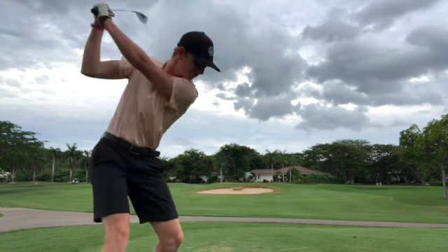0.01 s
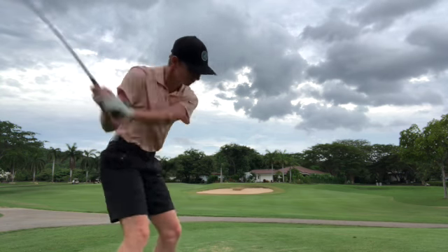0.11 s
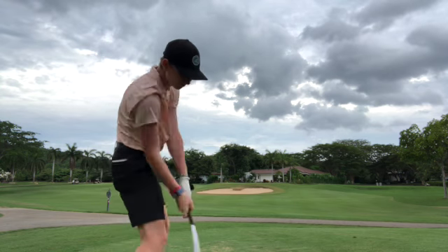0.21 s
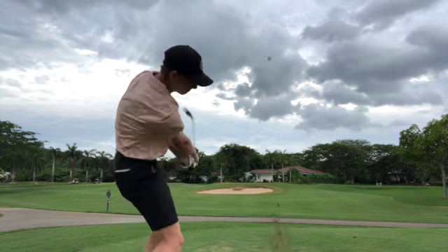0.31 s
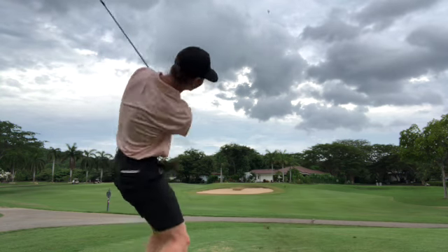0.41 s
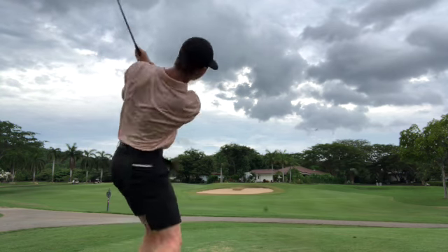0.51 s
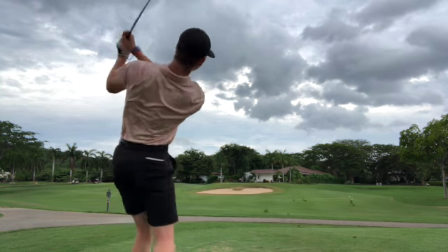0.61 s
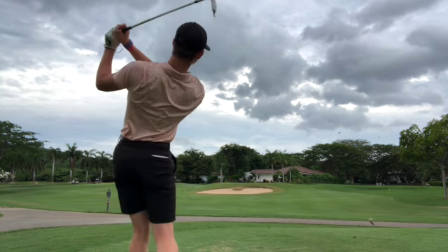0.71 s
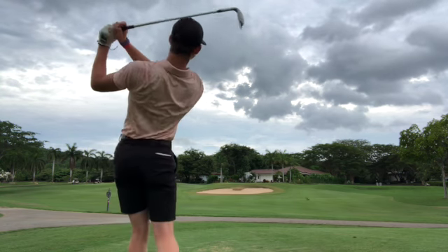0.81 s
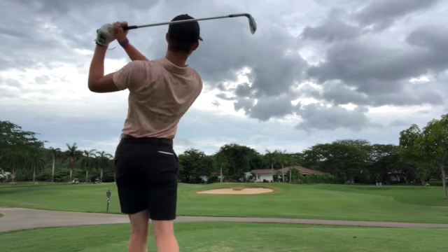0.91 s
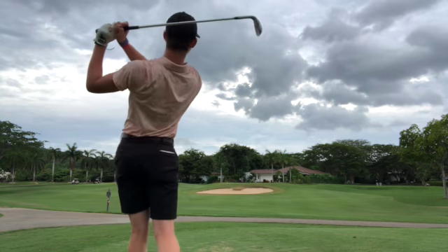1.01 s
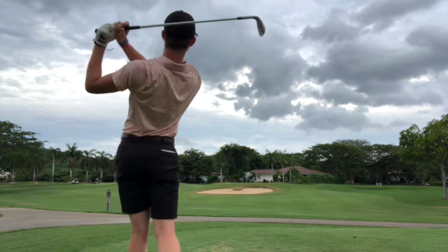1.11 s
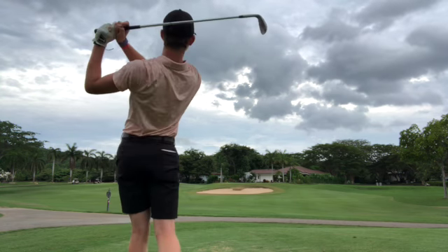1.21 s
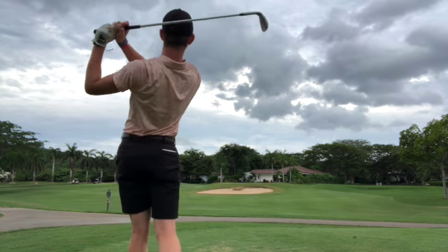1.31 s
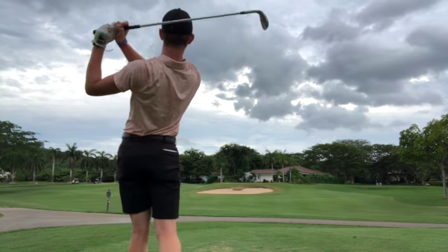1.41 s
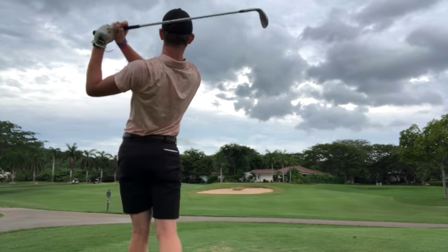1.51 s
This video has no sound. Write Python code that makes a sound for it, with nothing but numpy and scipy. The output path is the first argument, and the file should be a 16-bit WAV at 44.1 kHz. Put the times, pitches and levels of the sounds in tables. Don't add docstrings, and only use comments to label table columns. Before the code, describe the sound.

A golf club swing rushes up in a brief airy whistle, then a hard dry crack on the ball with a small ground thud and grass spray; faint ticks and distant birds follow on an open course.

```python
import sys
import numpy as np
from scipy import signal
from scipy.fft import rfft, irfft
from scipy.io import wavfile
from scipy.ndimage import uniform_filter1d

SR = 44100
rng = np.random.default_rng(int(sys.argv[2]) if len(sys.argv) > 2 else 0)


def unload_wav(signal):
    wavfile.write(
        sys.argv[1],
        SR,
        np.round(np.clip(np.atleast_2d(signal).T, -1, 1) * 32767).astype(np.int16),
    )


def gain_from_db(level_db):
    decades = np.asarray(level_db, float) / 20
    return 10 ** decades


N = 70560
T = np.arange(N) / SR
BALL_S = 0.25753
TURF_END_S = 0.26616


def noise():
    return rng.standard_normal(N)


def coloured(x, points):
    point_hz, point_db = np.array(points).T
    hz = np.maximum(np.arange(N // 2 + 1) * SR / N, 1)
    gain = gain_from_db(np.interp(np.log(hz), np.log(point_hz), point_db))
    low_cut = np.minimum(hz / point_hz[0], 1) ** 4
    y = irfft(rfft(x) * gain * low_cut, N)
    return y / np.std(y)


def walk(rate):
    hold = int(SR / rate)
    steps = np.repeat(rng.standard_normal(N // hold + 1), hold)
    return 1.2 * uniform_filter1d(uniform_filter1d(steps, hold), hold)[:N]


def fade(start, t60, rise=0.000067):
    age = np.maximum(T - start, 0)
    return (1 - np.exp(-age / rise)) * gain_from_db(-60 * age / t60)


def sine(hz, start):
    return np.sin(2 * np.pi * hz * (T - start))


def grit(spread_db):
    return noise() * gain_from_db(spread_db * np.minimum(rng.exponential(size=N), 4))


# (frequency [Hz], level [dB], t60 [s])
HEAD_MODES = [(545, -25, 0.015), (661, -23.5, 0.041), (840, -26.5, 0.039), (1184, -23, 0.028),
              (1424, -20, 0.028), (1620, -26.5, 0.03), (1833, -19.5, 0.015), (1936, -36.5, 0.035),
              (2467, -22.5, 0.011), (2850, -13, 0.0055), (6030, -22.5, 0.02), (7180, -32.5, .02),
              (10500, -17, 0.0057), (14200, -17, 0.0046)]


def strike():
    start_hz, end_hz, glide_s = 3500, 1830, 0.00045
    age = np.maximum(T - BALL_S, 0)
    cycles = end_hz * age + (start_hz - end_hz) * glide_s * (1 - np.exp(-age / glide_s))
    ball = -gain_from_db(-6) * fade(BALL_S, 0.0062, 0.000258) * np.sin(2 * np.pi * cycles)

    touch_s = BALL_S - 0.00014
    face = gain_from_db(-16) * fade(touch_s, 0.017, 0.00017) * sine(3620, touch_s)
    crack = gain_from_db(-27) * fade(touch_s, 0.005) * np.diff(rng.standard_normal(N + 1))

    head = 0
    for k, (hz, db, t60) in enumerate(HEAD_MODES):
        polarity = (-1) ** k
        head = head + polarity * gain_from_db(db) * fade(BALL_S, t60, 0.00063) * np.sin(2 * np.pi * hz * age)
    return ball + face + crack + head


# (time [s], vortex pitch [Hz], level [dB])
SHAFT_WHISTLE = [
    (0.169, 270, -75),
    (0.195, 376, -49),
    (0.203, 429, -50),
    (0.216, 466.5, -40.5),
    (0.226, 498, -32.5),
    (0.231, 566, -54.5),
    (0.244, 537, -36.5),
    (.249, 545, -57),
    (0.254, 543, -31.5),
]
# (frequency [Hz], level [dB per Hz])
RUSH_SPECTRUM = [(250, -9.5), (600, -9.5), (1050, -6.5), (2300, -11.5), (3740, -16.5), (5190, -20.5),
                 (7490, -24), (16000, -36)]


def swing():
    time, hz, db = np.array(SHAFT_WHISTLE).T
    pitch = np.interp(T, time, hz)
    onset = np.clip((T - time[0] + 0.026) / 0.029, 0, 1)
    stop = gain_from_db(-60 * np.maximum(T - 0.256, 0) / 0.033)

    wobble, roughness = 0.018, 0.63
    phase = 2 * np.pi * np.cumsum(pitch * (1 + wobble * walk(150.2))) / SR
    in_phase = (1 + roughness * walk(400)) * np.sin(phase)
    quadrature = roughness * walk(400) * np.cos(phase)
    tone_level = gain_from_db(uniform_filter1d(np.interp(T, time, db), size=100))
    tone = np.sqrt(2) * (in_phase + quadrature) * tone_level

    speed_db = 27 * np.log2(pitch / 520)
    sag_db = 24.5 * np.maximum(T - 0.14, 0)
    rush_level = gain_from_db(-45 + speed_db - sag_db + 2.2 * walk(160))
    return onset * stop * (tone + coloured(noise(), RUSH_SPECTRUM) * rush_level)


# (frequency [Hz], level [dB per Hz])
TURF_SPECTRUM = [(180, -43.5), (300, -13.5), (1000, -10.5), (1600, -9.5), (4750, -16.5), (6100, -9.5),
                 (7690, -16.5), (16000, -23.5)]
# (time [s], frequency [Hz], level [dB], t60 [s])
SOIL_THUMPS = [
    (0.258, 78.6, -42, 0.12),
    (.262, 195.3, -32.5, 0.077),
    (0.2688, 398, -25.5, 0.025),
    (0.284, 123, -39.5, 0.075),
]
# (frequency [Hz], level [dB per Hz])
SPRAY_SPECTRUM = [(180, -30), (300, -4), (1340, -13), (1530, -14), (2610, -14), (5900, -19.5), (14700, -30),
                  (16000, -40)]


def ground():
    rise = np.clip((T - 0.2546) / 0.0035, 0, 1)
    sag_db = -11.5 * np.clip((T - BALL_S) / (TURF_END_S - BALL_S), 0, 1)
    release_db = -60 * np.maximum(T - TURF_END_S, 0) / 0.012
    turf = gain_from_db(-22.5) * rise * gain_from_db(sag_db + release_db) * coloured(grit(0.65), TURF_SPECTRUM)

    thump = sum(gain_from_db(db) * fade(s, t60, 0.00064) * sine(hz, s) for s, hz, db, t60 in SOIL_THUMPS)

    early = gain_from_db(-49.5) * fade(TURF_END_S, 0.24, 0.0031)
    late = gain_from_db(-65.5) * fade(TURF_END_S, 2.57, 0.012)
    spray = (early + late) * coloured(grit(2.13), SPRAY_SPECTRUM) * gain_from_db(1.8 * walk(47.6))
    return turf + thump + spray


# (frequency [Hz], level [dB per Hz])
SCUFF_SPECTRUM = [(200, -1.5), (650, -4.5), (1040, 0), (1500, -5.5), (3400, -13.5), (5700, -28),
                  (16000, -31)]
# (time [s], frequency [Hz], level [dB], t60 [s])
TICKS = [(.286, 2300, -45, .008), (.291, 540, -51, .04), (.297, 1100, -52, .02), (.355, 1800, -54, .005),
         (.4323, 2200, -44, .005), (.4343, 2500, -49, .006), (.4345, 400, -57, .02),
         (.455, 3000, -53, .002), (.4605, 2900, -51, .003), (.472, 3000, -54, .002),
         (.4809, 12000, -54, .0012), (.5463, 1040, -51, .008), (.5512, 2600, -45, .0025),
         (.5601, 2500, -44, .002), (.5745, 3500, -48, .0025), (.5795, 3500, -45, .0025),
         (.583, 1050, -50, .012), (.5884, 3800, -45, .0025), (.5665, 2900, -50, .003),
         (.586, 1100, -50, .01), (.6078, 1600, -46, .006), (.6125, 900, -50, .01),
         (.6768, 6500, -46, .0015), (.6773, 3200, -53, .002), (.7248, 14000, -49, .0013),
         (.7251, 7500, -54, .0015), (.7252, 1950, -43.5, .005)]


def shoe():
    rise = np.clip((T - 0.5153) / 0.053, 0, 1)
    stop = np.exp(-np.maximum(T - 0.612, 0) / 0.0043)
    scuff = gain_from_db(-57.5 + 2 * walk(250)) * rise * stop * coloured(grit(2.5), SCUFF_SPECTRUM)
    ticks = sum(gain_from_db(db) * fade(s, t60) * sine(hz, s) for s, hz, db, t60 in TICKS)
    return scuff + ticks


# (time [s], length [s], start pitch [Hz], end pitch [Hz], level [dB])
REEDY_NOTES = [
    (.782, .021, 1450, 1450, -63),
    (.8, .028, 1495, 1515, -59),
    (.826, .011, 1990, 2000, -64),
    (1.54, .04, 1620, 1715, -66),
    (1.572, .024, 1745, 1655, -59),
    (1.588, .02, 1660, 1530, -61),
]
# (time [s], length [s], start pitch [Hz], end pitch [Hz], level [dB])
PURE_NOTES = [(.09, .07, 2000, 2650, -68), (.3, .05, 2650, 2650, -66), (.41, .045, 2620, 2650, -65),
              (.533, .015, 2500, 2750, -63), (.685, .015, 3500, 3500, -70), (.91, .022, 3050, 2900, -67),
              (.94, .014, 2900, 3200, -67), (.93, .018, 4000, 4100, -69), (.948, .026, 3850, 3480, -65),
              (.96, .05, 1900, 1920, -70), (.975, .036, 2800, 2880, -68), (1.1, .01, 3100, 3250, -69),
              (1.108, .022, 2200, 1880, -69), (1.115, .015, 4700, 4900, -72), (1.155, .03, 2760, 2840, -65),
              (1.178, .035, 2750, 1650, -70), (1.2, .045, 1400, 1380, -73), (1.11, .025, 2850, 2850, -70),
              (.845, .02, 2000, 2100, -71), (1.21, .055, 2900, 3170, -70), (1.29, .04, 2850, 2700, -71),
              (1.355, .035, 3180, 2930, -69), (1.378, .028, 2780, 2620, -69),
              (1.362, .048, 2120, 2310, -65), (1.515, .02, 2250, 2220, -70)]
# (frequency [Hz], level [dB])
THROAT = [(1600, -18), (2900, 0), (3500, 0), (4400, -12), (5100, -7), (6000, -13), (6700, -25)]


def throat_db(hz):
    throat_hz, level_db = np.array(THROAT).T
    return np.interp(np.log(hz * np.arange(1, 5)), np.log(throat_hz), level_db)


def birds():
    shake = 1 + 0.0079 * walk(120)
    flutter = gain_from_db(0.72 * walk(250)) + gain_from_db(-7) * walk(900)
    calls = [(note, throat_db(note[2])) for note in REEDY_NOTES]
    calls += [(note, [0]) for note in PURE_NOTES]

    song = 0
    for (start, length, hz0, hz1, db), harmonics_db in calls:
        progress = np.clip((T - start) / length, 0, 1)
        phase = 2 * np.pi * np.cumsum((hz0 + (hz1 - hz0) * progress) * shake) / SR
        envelope = np.clip(np.minimum(progress / 0.24, (1 - progress) / 0.15), 0, 1)
        voice = sum(gain_from_db(g) * np.sin((k + 1) * phase) for k, g in enumerate(harmonics_db))
        song = song + gain_from_db(db - 1.5) * envelope * voice
    song = song * flutter

    trees = (noise() * fade(0.0059, 0.12))[:SR // 4]
    trees = trees / np.sqrt(np.sum(trees ** 2))
    return song + gain_from_db(-8) * signal.fftconvolve(song, trees)[:N]


# (time [s], length [s], low edge [Hz], high edge [Hz], level [dB])
CHIRRS = [
    (0.083, 0.078, 2150, 9100, -73),
    (0.342, 0.062, 4600, 8900, -70.5),
    (0.47, 0.17, 4950, 12500, -79.5),
    (0.512, 0.077, 9100, 14000, -73.5),
    (0.803, 0.046, 2050, 6500, -80),
    (0.893, 0.11, 2020, 6030, -70),
    (1.084, 0.059, 1450, 6800, -68),
    (1.165, 0.093, 1220, 3860, -69),
    (1.351, 0.074, 1960, 5260, -69.5),
    (1.518, 0.097, 1970, 5870, -72),
]


def chirr():
    out = 0
    for start, length, low_hz, high_hz, db in CHIRRS:
        grains = coloured(grit(2.5), [(low_hz, 0), (high_hz, -8), (1.5 * high_hz, -30)])
        swell = np.sin(np.pi * np.clip((T - start) / length, 0, 1)) ** 2
        out = out + gain_from_db(db - 1.0 + 1.2 * walk(230)) * swell * grains
    return out


# (multiple of 91.05 Hz, level [dB])
MOTOR_PARTIALS = [(.55, -68.5), (1, -65.5), (1.95, -78), (3, -80)]


def motor():
    phase = 2 * np.pi * np.cumsum(91.05 * (1 + 0.025 * walk(11))) / SR
    lope = 1 + 0.67 * np.cos(2 * np.pi * 11.2 * (T - 0.99))
    drone = 0
    for multiple, db in MOTOR_PARTIALS:
        throb_db, beat = (1.5, lope) if multiple >= 1 else (5, 1)
        drone = drone + gain_from_db(db + 1.0 + throb_db * walk(22)) * np.sin(multiple * phase) * beat
    return drone


# (frequency [Hz], level [dB per Hz])
AIR_SPECTRUM = [(48, -4), (112, -1), (600, -18), (1600, -17), (3300, -24), (6300, -32.5), (9900, -31),
                (11000, -39)]


def open_air():
    air = coloured(noise(), [*AIR_SPECTRUM, (13500, -39.5), (15800, -44.5)])
    low = uniform_filter1d(air, size=40)
    high_drift_db = -0.5 * np.maximum(T - 0.5, 0)
    high = (air - low) * gain_from_db(high_drift_db + 0.48 * walk(8.6))
    return gain_from_db(-64) * (low * gain_from_db(0.71 * walk(23)) + high)


def scene():
    near = strike() + swing() + ground() + shoe()
    far = birds() + chirr() + motor() + open_air()
    return (near + far)[None]


def low_pass(x):
    return signal.sosfilt(signal.butter(12, 16680, fs=SR, output="sos"), x)


def record(dry):
    bass_cut = signal.butter(3, 39, "high", fs=SR, output="sos")
    top_cut = signal.ellip(8, 0.2, 70, 16000, fs=SR, output="sos")
    mix = signal.sosfilt(top_cut, signal.sosfilt(bass_cut, dry))
    return low_pass(mix)


dry = scene()
out = record(dry)
unload_wav(out)
```